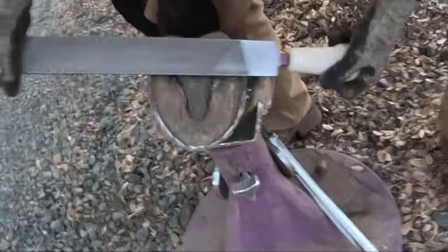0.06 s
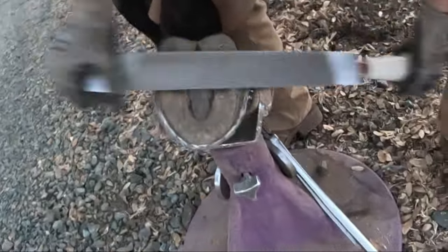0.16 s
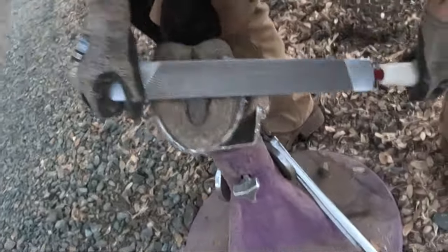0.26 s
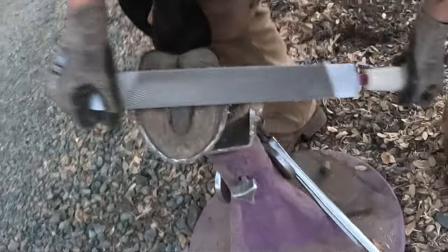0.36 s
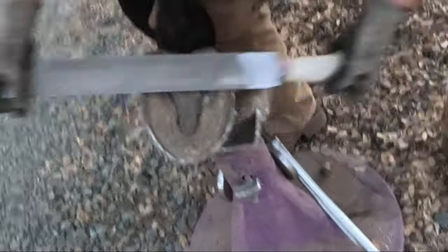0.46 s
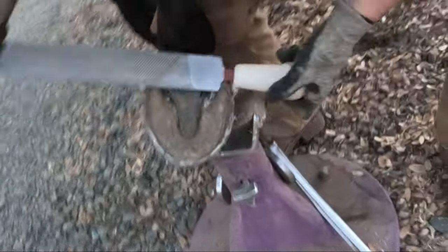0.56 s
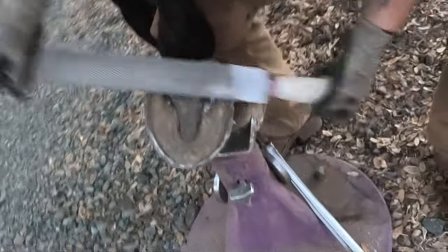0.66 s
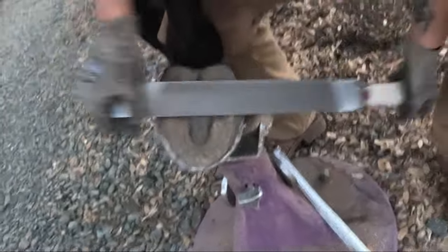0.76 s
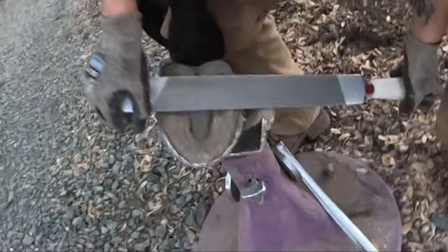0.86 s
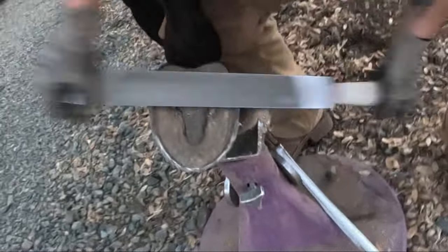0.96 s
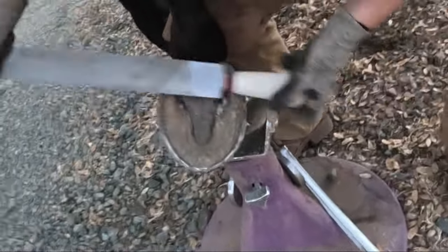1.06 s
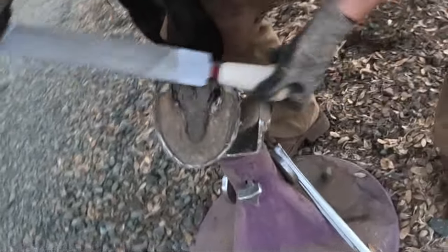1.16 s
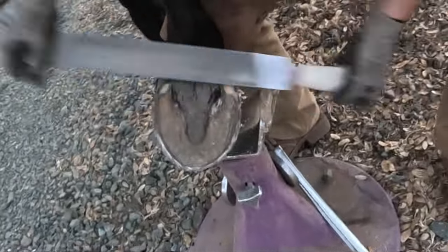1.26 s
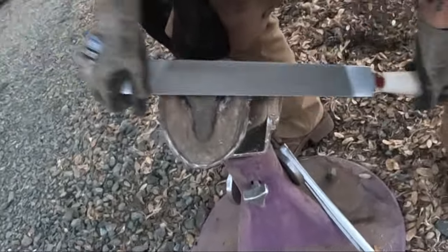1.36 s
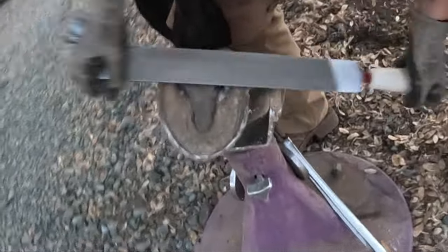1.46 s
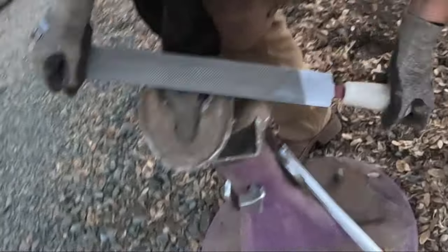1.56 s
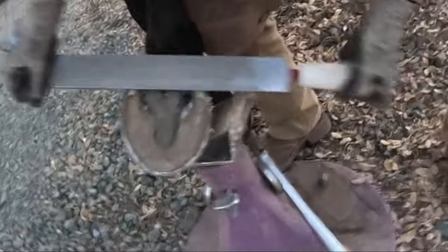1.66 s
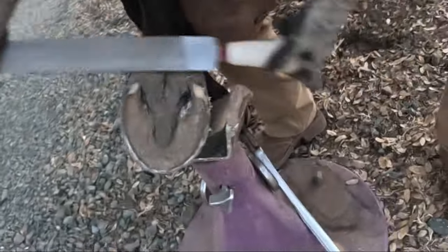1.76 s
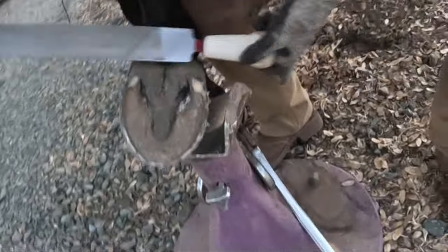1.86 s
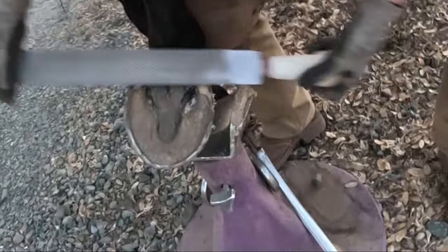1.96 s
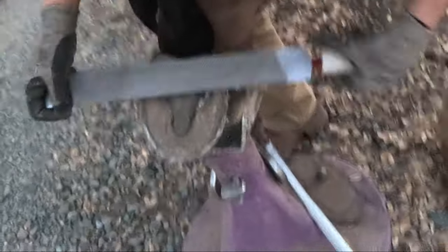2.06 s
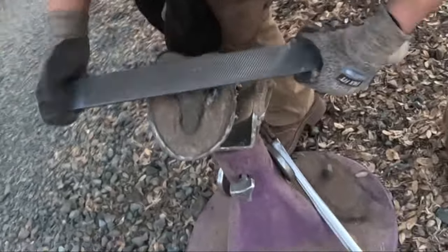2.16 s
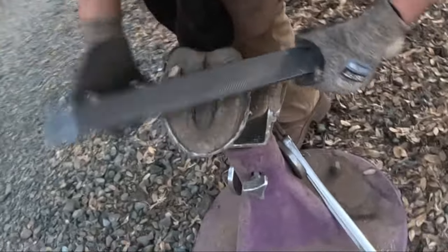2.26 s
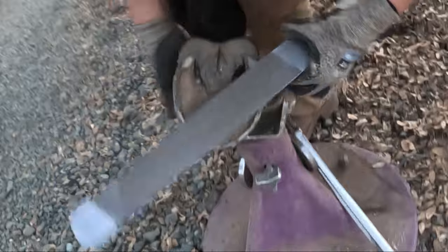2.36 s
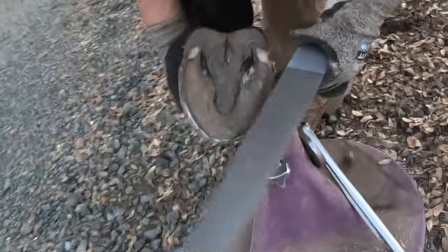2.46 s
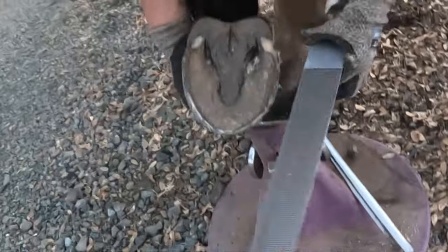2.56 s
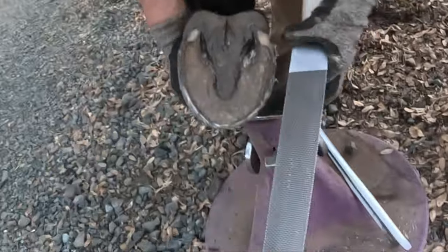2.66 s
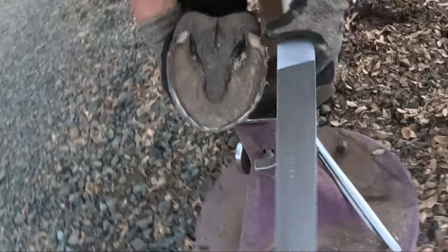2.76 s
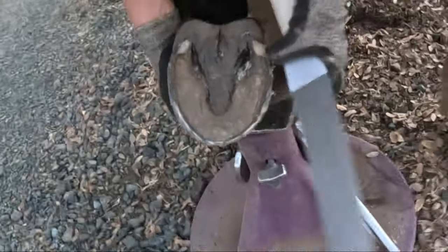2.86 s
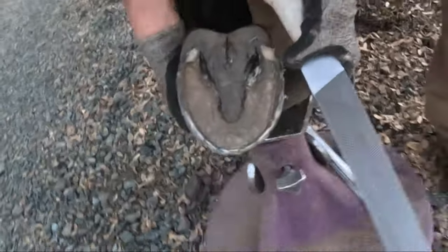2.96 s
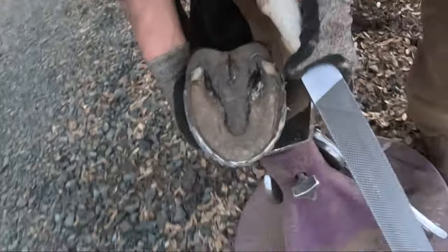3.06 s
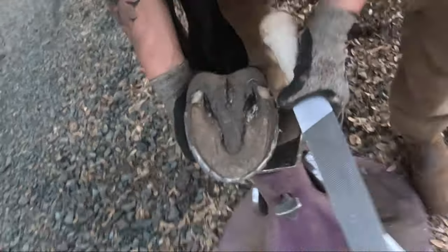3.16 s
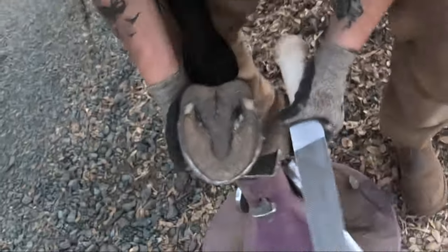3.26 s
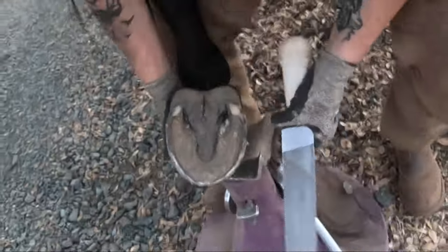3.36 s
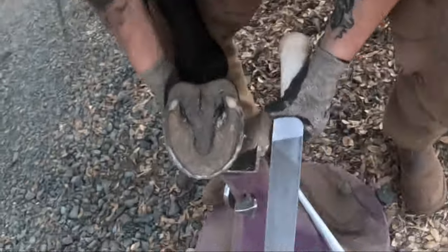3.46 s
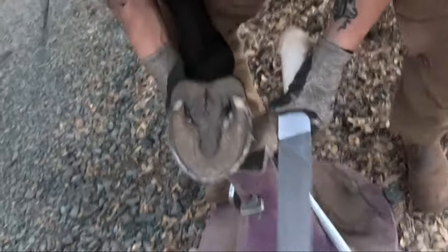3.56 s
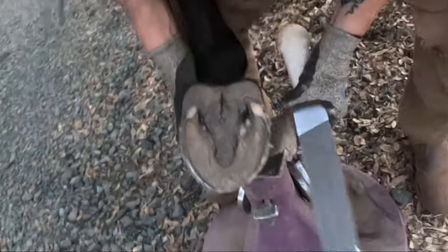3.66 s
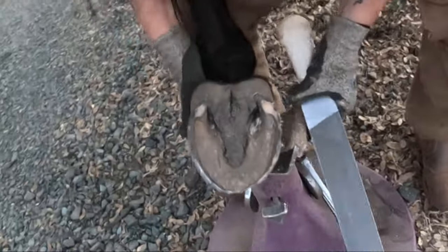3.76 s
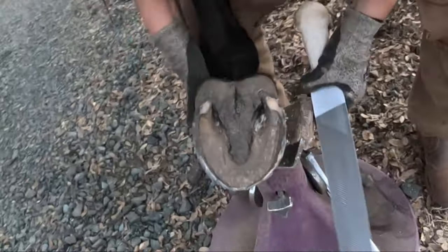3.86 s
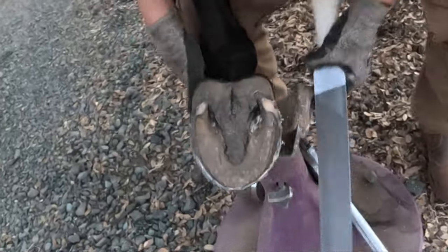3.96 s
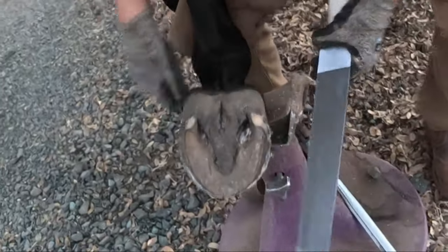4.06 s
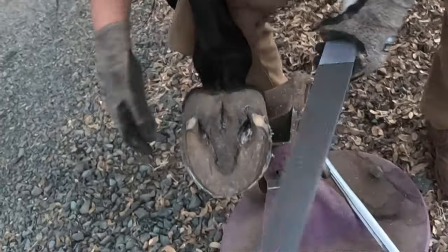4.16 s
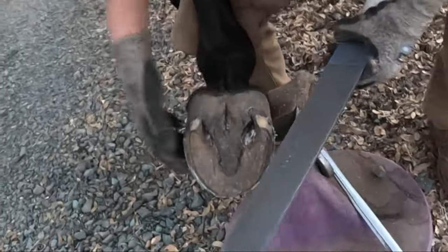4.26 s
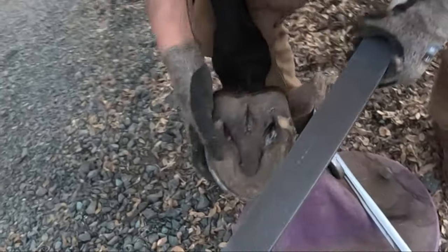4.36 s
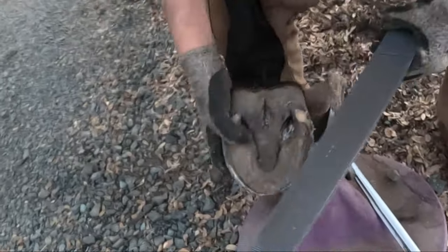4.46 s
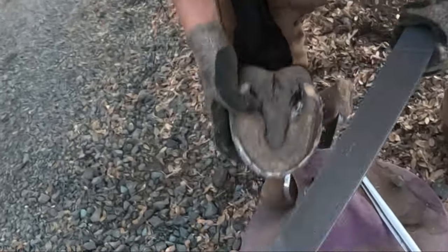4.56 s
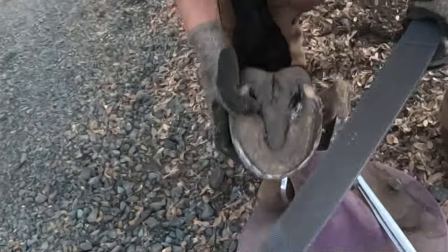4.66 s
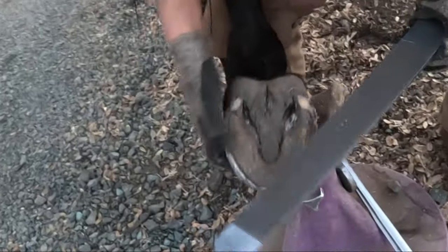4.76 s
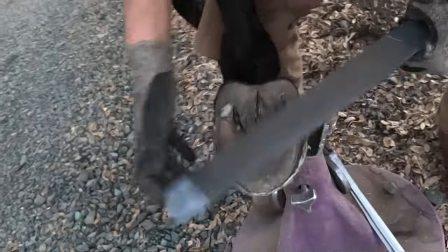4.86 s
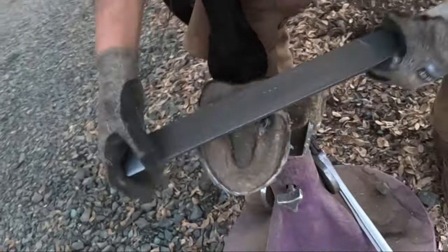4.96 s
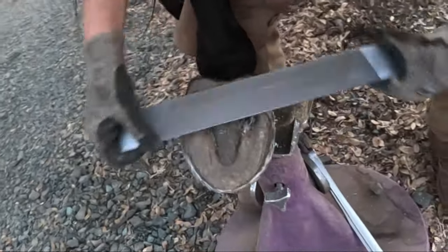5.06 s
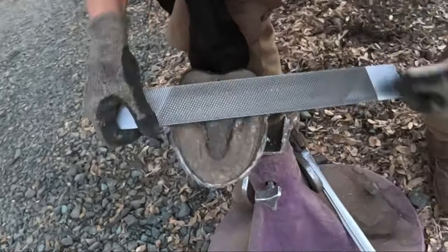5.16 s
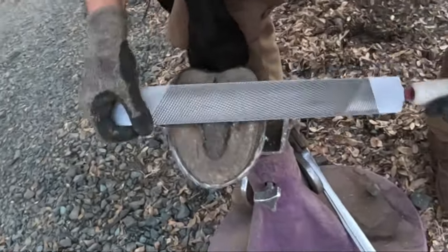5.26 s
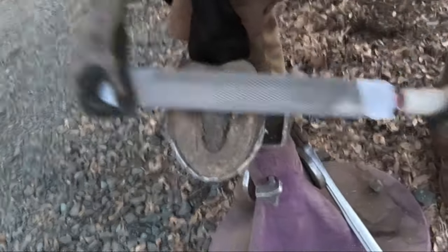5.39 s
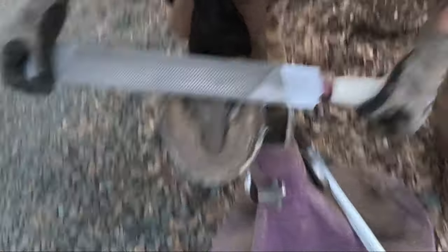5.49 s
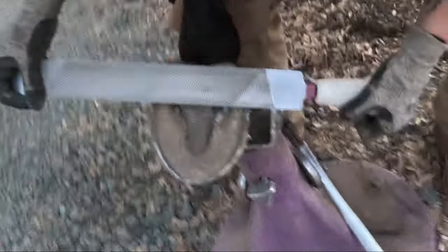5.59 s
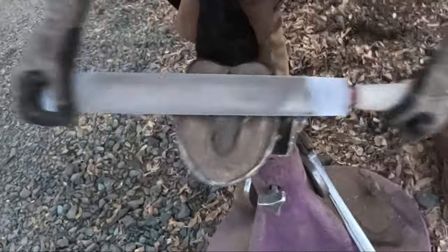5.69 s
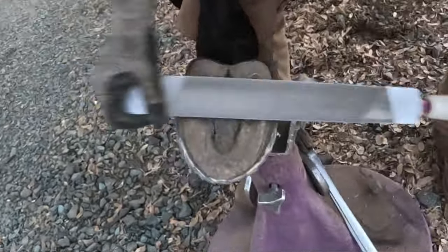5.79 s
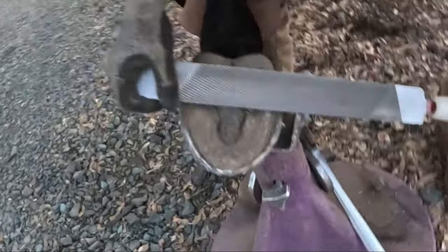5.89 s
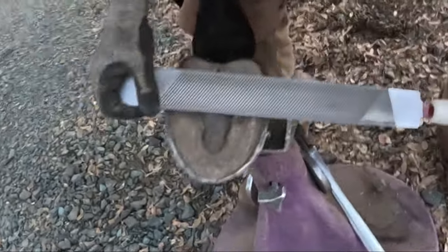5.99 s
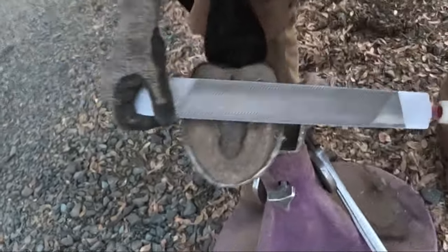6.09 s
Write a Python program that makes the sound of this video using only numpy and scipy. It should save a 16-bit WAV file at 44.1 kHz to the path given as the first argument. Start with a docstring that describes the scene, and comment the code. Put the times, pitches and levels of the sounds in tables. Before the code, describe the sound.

Close, dry, outdoor sound in one channel, over faint steady air hiss and soft deep wind rumble. From 0 to 1.25 s a flat steel rasp cuts a horse's hoof in five short strokes, about four per second, each under a fifth of a second: gritty tearing, growing brighter, with metallic ringing and a hollow low shake from the plastic stand. Light bumps fall between them. Weaker strokes come at 1.6 and 1.75 s, the latter buried under a loud rattling cluster of hollow knocks. A small metallic touch and rustle come near 2.2 s, then quiet glove and cloth shuffling. From 3.0 to 3.9 s the hoof bumps and shifts unevenly, loudest at 3.2 s, with further knocks at 3.35 and 3.65 s. Soft rubbing dwindles from 4.1 s to near stillness around 5. A light steel tap at 5.25 s precedes final strokes at 5.5 and 5.85 s, with small knocks between; the last rings brightest.

```python
"""A flat steel rasp files a horse's hoof that rests on a hollow plastic stand, outdoors.
Random grains, standing for teeth tearing chips from the horn, ring the steel bar and shake hoof and stand.
The hoof shifts and knocks in its cradle: noise and clicks ring the modes (natural pitches) of the stand.
Gloves and cloth rustle as coloured grains; a light wind rumbles on the microphone as deep noise,
and a steady coloured noise makes the distant outdoor hiss."""
import sys
import numpy as np
from scipy import signal
from scipy.fft import rfft, irfft, next_fast_len
from scipy.io import wavfile

SR = 44100
rng = np.random.default_rng(int(sys.argv[2]) if len(sys.argv) > 2 else 0)


def pcm_store(signal):
    """Save signal as 16-bit PCM."""
    levels = np.round(np.clip(np.atleast_2d(signal), -1, 1) * 32767)
    wavfile.write(sys.argv[1], SR, levels.astype(np.int16).T)


N = 270271   # length of the scene in samples

# rasp strokes: (start [s], time to full speed [s], length [s], cutting level [dB], time to hardest push [s],
# shake of the stand [dB], treble of the bite at the start [dB], contact at the start [share of bar length],
# contact at the end [share of bar length], ring of the bar against the chips [dB])
STROKES = [(-0.04, 0.042, 0.16, -23, 0.086, -24.5, -16.5, 0.35, .75, -13),
           (0.19, 0.13, .18, -23.5, 0.14, -21.5, -17, 0.2, .75, -10.5),
           (0.494, 0.047, 0.21, -25.5, 0.15, -22, -13.5, 0.28, 0.743, -16.5),
           (0.763, 0.1, 0.19, -26.5, 0.11, -25, -15.5, 0.21, 0.857, -7.5),
           (1.054, 0.071, 0.2, -27, 0.12, -25, -11.5, 0.28, .75, -10),
           (1.57, 0.036, 0.14, -35, 0.066, -30.5, -11.5, 0.25, 0.8, -6.5),
           (1.71, 0.16, .2, -40, .1, -27, -17, .35, 0.724, -8),
           (5.503, 0.12, 0.16, -28, 0.11, -38.5, -17, 0.27, 0.9, -10),
           (5.84, 0.053, 0.15, -22.5, 0.03, -28.5, -15.5, 0.36, 0.67, -3)]
# hoof knocking in the cradle: (time [s], relative strength [dB], pitch most strongly struck [Hz])
KNOCKS = [(0.145, -17, 567), (0.624, -3.5, 496), (1.166, -6, 250), (1.512, -16.5, 483), (1.731, 7.5, 310),
          (1.742, 4.5, 285), (1.755, 2.5, 243), (1.774, 8, 259), (1.798, -6, 400), (1.942, -20, 1008),
          (1.965, -21.5, 597), (2.204, -15.5, 238), (2.494, -19.5, 220), (2.82, -16.5, 352),
          (3.007, -1.5, 650), (3.021, -2.5, 300), (3.069, -8, 684), (3.088, -12.5, 634), (3.202, -4.5, 754),
          (3.213, 3.5, 633), (3.222, 9, 274), (3.242, -3.5, 296), (3.289, -1, 673), (3.327, -10.5, 681),
          (3.352, 5, 710), (3.377, -3, 668), (3.491, -21.5, 524), (3.519, -28, 255), (3.639, 3.5, 413),
          (3.77, -7.5, 576), (3.855, -13, 242), (3.918, -17.5, 535), (4.128, -12.5, 259),
          (4.565, -25.5, 514), (4.724, -30, 587), (4.76, -33.5, 705), (5.001, -32, 300),
          (5.273, -23.5, 507), (5.341, -26.5, 508), (5.618, -8.5, 1220), (5.74, -5, 560),
          (5.748, -6.5, 357), (5.81, -9.5, 272)]
# rasp touching down on the horn: (time [s], relative strength [dB])
TAPS = [(1, -38), (1.51, -22), (1.516, -20), (2.166, -25.5), (2.173, -20.5), (3.634, -22), (3.639, -18.5),
        (5.235, -22), (6.083, -32.5)]
# grit ticking under a glove: (time [s], relative strength [dB], centre [Hz])
TICKS = [(1.0256, -35, 3750), (1.205, -7.5, 3540), (2.6554, -34, 3130), (2.7252, -29, 3850),
         (1.977, -37, 5540), (3.0949, -32, 4040), (3.5406, -20.5, 3450), (4.7671, -30.5, 6900)]
# bending modes of the steel bar: (pitch [Hz], width while filing [Hz], relative level [dB])
BAR_MODES = [(1170, 60, -2), (1703, 50, -2), (2430, 70, 1), (3245, 90, 0), (4270, 75, -3), (5215, 75, -7),
             (6275, 85, -10), (7545, 75, -12), (8760, 120, -18), (10400, 90, -24), (12700, 60, -31),
             (13100, 60, -33)]
# modes of hoof and stand: (pitch [Hz], width while shaken [Hz], relative level [dB])
STAND_MODES = [(212, 140, -3.5), (249, 42, 4.5), (353, 47, -3.5), (518.8, 73, -5), (638, 60, -8),
               (718, 84, -8), (820, 140, -12.5), (1032, 100, -16.5), (1343, 120, -16), (1970, 170, -26)]
# colour of the torn horn: (frequency [Hz], relative level [dB per Hz])
CHIPS = [(530, -18.5), (900, -1.5), (1670, 1), (2020, -6.5), (2420, 2.5), (3220, 4), (3670, -9),
         (4390, -10), (4770, -13.5), (7680, -24.5), (13100, -40), (15500, -51)]
# colour of the rubbing cloth: (frequency [Hz], relative level [dB per Hz])
CLOTH = [(530, -42), (900, -3), (2120, -3), (3220, -7.5), (4660, -18), (9180, -24.5), (15500, -45)]
# colour of the distant outdoor hiss: (frequency [Hz], relative level [dB per Hz])
AIR = [(82, -34), (140, 8), (497, -2.5), (868, -32), (1580, -2), (1970, -14.5), (9780, -23), (12000, -58.5),
       (15600, -61.5), (22000, -120)]
# wind on the microphone: (time [s], level [dB])
WIND = [(0.05, -42), (0.912, -44.5), (1.108, -41), (1.399, -51.5), (1.658, -45), (2.006, -48), (3.43, -43),
        (4.915, -54), (5.645, -42), (6.096, -48)]
# hoof, gloves and cloth shifting: (time [s], rise [s], hold [s], fall [s], shake of the lower modes [dB],
# shake of the upper modes [dB], rustle [dB], treble of the rustle against the rest [dB])
SHIFTS = [(1.513, 0.017, 0.013, 0.14, -33, -39.5, -49.5, -2.5),
          (1.729, 0.036, .05, 0.061, -9.5, -17, -35.5, -13),
          (2.181, 0.033, 0.011, 0.16, -32, -37.5, -41.5, -14),
          (2.341, 0.12, .01, 0.13, -44, -52, -45.5, -16), (2.487, 0.089, 0.025, 0.26, -34.5, -49, -44, -20),
          (2.74, 0.24, 0.018, 0.16, -60, -57, -44.5, -13),
          (2.822, 0.041, 0.012, 0.073, -36.5, -41, -44, -12),
          (2.971, 0.068, 0.063, 0.1, -20, -21, -40.5, -4.5),
          (3.204, 0.012, 0.012, 0.087, -11.5, -13.5, -28, -19.5),
          (3.297, 0.026, 0.0055, 0.12, -35, -23.5, -45.5, -7),
          (3.351, 0.033, 0.011, 0.058, -24, -28, -39.5, -11.5),
          (3.385, 0.037, 0.018, 0.28, -30.5, -25.5, -42, -10.5),
          (3.522, 0.077, 0.025, 0.072, -22.5, -24.5, -45.5, -14.5),
          (3.63, 0.018, 0.012, 0.12, -25, -26.5, -39.5, -18),
          (3.771, 0.014, 0.0072, 0.091, -36, -32.5, -62, -8),
          (3.844, 0.018, 0.028, 0.081, -29, -35, -54, -7), (3.92, 0.033, 0.007, .1, -33, -32.5, -30, -27),
          (4.14, 0.14, 0.018, 0.056, -38.5, -41.5, -45, -16), (4.39, 0.12, .01, 0.41, -61, -61, -55.5, -13),
          (4.754, 0.057, 0.016, 0.065, -57, -43, -60.5, -8),
          (4.86, .06, 0.024, .2, -73.5, -72.5, -63.5, -6),
          (5.241, .05, 0.023, 0.19, -48.5, -51, -47.5, -8.5),
          (5.667, .05, 0.017, 0.13, -35.5, -42, -56, -18), (5.75, .02, 0.019, .1, -38, -36, -63, -10),
          (5.81, 0.024, 0.029, 0.072, -30, -30, -40.5, -34)]
# steady handling under the shifts: (time [s], rustle [dB], shake [dB])
HANDLING = [(0.15, -60, -40), (0.4, -55, -64), (0.49, -50, -56), (0.76, -51, -46), (1.0, -57.5, -53),
            (1.27, -56.5, -47.5), (1.42, -76.5, -77), (1.92, -55.5, -47.5), (2.1, -70, -72),
            (2.25, -54.5, -51.5), (3.15, -55.5, -46.5), (3.45, -61.5, -52), (4.05, -50, -41.5),
            (4.29, -62, -51), (4.9, -62, -69), (5.2, -59, -59), (5.48, -62.5, -87), (5.7, -49, -36),
            (6.0, -57, -47.5), (6.12, -62, -55)]

AIR_DB = -62.5
UPPER_STAND_HZ, TREBLE_HZ = 420, 4880   # where the stand's upper modes and the treble begin
CUTOFF_HZ = 15700
CUT_POWER, PUSH_POWER = 1.37, 1.18   # cutting level and shake grow as these powers of the effort
BITE_SWING_DB = 13   # the treble of the bite grows by this much along each stroke
STROKE_UPPER_DB = -1   # upper modes against lower while filing and handling
SETTLE_DB_PER_S = 357   # fastest fall of the shake from the strokes
SWING_DB = 30   # a shift rises and falls by this much in its rise and fall times
HANDLING_TREBLE_DB = -11   # treble of the steady rustle against the rest


def amp(db):
    """Turn decibels into a gain."""
    return 10 ** (np.asarray(db) / 20)


def rms_one(x):
    """Scale to an rms (average strength) of 1."""
    return x / np.sqrt(np.mean(x ** 2) + 1e-20)


def in_time(rows, column):
    """One column of a table, joined by straight lines in time."""
    rows = np.array(rows)
    return np.interp(np.arange(N) / SR, rows[:, 0], rows[:, column])


def drift(rate_hz):
    """A slow random wander with an rms of 1, made at every 40th sample and joined by lines."""
    r = np.exp(-80 * np.pi * rate_hz / SR)
    noise = rng.standard_normal(N // 40 + 2002)
    slow = signal.lfilter([1], [1, -2 * r, r * r], noise)[2000:]   # drop the filter's start
    return np.interp(np.arange(N) / 40, np.arange(len(slow)), rms_one(slow))


def grains(per_s, spread_db):
    """Random clicks of uneven size and sign, with an rms of 1."""
    sizes = amp(spread_db * np.minimum(rng.exponential(1, N), 5))
    signs = rng.choice([-1, 1], N)
    present = rng.random(N) < per_s / SR
    return rms_one(sizes * signs * present)


def colour(x, spectrum):
    """Filter by a (Hz, dB per Hz) table, then scale to an rms of 1."""
    size = next_fast_len(N)
    hz, level_db = np.transpose(spectrum)
    log_hz = np.log(np.arange(size // 2 + 1) * SR / size + 1)   # 1 Hz added to avoid log of zero
    gain = amp(np.interp(log_hz, np.log(hz), level_db))
    return rms_one(irfft(rfft(x, size) * gain, size)[:N])


def ring(x, hz, width_hz):
    """A click sets off a dying sine; a wider mode dies faster."""
    r, w = np.exp(-np.pi * width_hz / SR), 2 * np.pi * hz / SR
    return signal.lfilter([0, np.sin(w)], [1, -2 * r * np.cos(w), r * r], x + 1e-18)


def split(x, hz):
    """The low and the high part around a frequency."""
    return [signal.sosfilt(signal.butter(4, hz, kind, fs=SR, output="sos"), x) for kind in ("low", "high")]


def bursts(times, levels_db, rise_s, fall_s):
    """Short noise bursts that swell and die."""
    shape = np.zeros(N) + 1e-18
    shape[(np.asarray(times) * SR).astype(int)] = amp(levels_db)
    shape = signal.lfilter([1], [1, -np.exp(-1 / (fall_s * SR))], shape)
    rise = np.exp(-1 / (rise_s * SR))
    shape = signal.lfilter([1 - rise], [1, -rise], shape)
    return shape * rng.standard_normal(N)


def brighten(x, treble_db):
    """Set the level of the treble against the rest."""
    dull, sharp = split(x, TREBLE_HZ)
    return rms_one(dull) + rms_one(sharp) * amp(treble_db)


def effort(start, to_peak, length):
    """Rise from 0 to 1 and back along a half-sine, with its top at the given delay."""
    top = min(to_peak, length - .005)
    turn = np.interp(np.arange(N) / SR - start, [0, top, length], [0, np.pi / 2, np.pi])
    return np.sin(turn).clip(0) * (turn < np.pi)


def along_strokes(first, last):
    """A value that runs from first to last through every stroke."""
    ends = np.ravel([(s, s + length) for s, _, length, *_ in STROKES])
    values = np.column_stack([first, last]).ravel()
    return np.interp(np.arange(N) / SR, np.maximum.accumulate(ends), values)


def pushing():
    """Gain with which the strokes shake the stand; its fall is limited to a set speed."""
    push = sum(amp(db) * effort(s, to_push, length) ** PUSH_POWER
               for s, _, length, _, to_push, db, *_ in STROKES)
    fall_db = SETTLE_DB_PER_S * np.arange(N) / SR
    push_db = 20 * np.log10(push + 1e-9)
    return amp(np.maximum.accumulate(push_db + fall_db) - fall_db)


def shifting(levels_db):
    """Gain of all shifts: each rises, holds and dies away, and their powers add."""
    t = np.arange(0, N, 32) / SR
    power = 0
    for (s, rise, hold, fall, *_), db in zip(SHIFTS, levels_db):
        before = (s - t).clip(0, 1) / rise
        after = (t - s - hold).clip(0, 1) / fall
        power = power + amp(db - SWING_DB * (before + after)) ** 2
    return np.interp(np.arange(N) / SR, t, np.sqrt(power))


def rasp():
    """Teeth tear chips and drive the bar; a mode is loud where the contact lies on a peak of its bending."""
    teeth = grains(12000, spread_db=-2.0) * amp(1.9 * drift(77))
    *_, bite_db, first, last, ring_db = np.transpose(STROKES)
    place = along_strokes(first, last)
    half_waves = 4.5 * np.sqrt(np.array(BAR_MODES)[:, 0] / BAR_MODES[0][0])   # pitch grows as their square
    steel = np.zeros(N)
    for k, (hz, width, db) in enumerate(BAR_MODES):
        driven = teeth * np.cos(np.pi * half_waves[k] * place)
        steel += amp(db) * np.sqrt(width) * (-1) ** k * ring(driven, hz, width)
    cut = amp(along_strokes(ring_db, ring_db)) * rms_one(steel) + colour(teeth, CHIPS)
    level = sum(amp(db) * effort(s, to_peak, length) ** CUT_POWER
                for s, to_peak, length, db, *_ in STROKES)
    filing = level * brighten(cut, along_strokes(bite_db, bite_db + BITE_SWING_DB))
    return filing + touch_down()


def touch_down():
    """Short noise bursts strike the bar, whose modes die faster than while filing."""
    at, tap_db = np.transpose(TAPS)
    taps = bursts(at, tap_db, rise_s=0.00063, fall_s=0.0042)
    return sum(amp(db - 25) * (-1) ** k * ring(taps, hz, 2.05 * width)
               for k, (hz, width, db) in enumerate(BAR_MODES))


def stand():
    """Strokes, handling and shifts shake the modes of hoof and stand; knocks strike them."""
    slips = grains(2500, spread_db=2.5) * amp(2.12 * drift(40))
    low, high = np.zeros((2, N))
    for k, (hz, width, db) in enumerate(STAND_MODES):
        uneven = slips * amp(2 * drift(4.2))   # each mode wanders by itself
        mode = amp(db) * np.sqrt(width) * (-1) ** k * ring(uneven, hz, width)
        if hz < UPPER_STAND_HZ:
            low += mode
        else:
            high += mode
    *_, lower_db, upper_db, _, _ = np.transpose(SHIFTS)
    steady = np.hypot(pushing(), amp(in_time(HANDLING, 2)))
    lower_level = np.hypot(steady, shifting(lower_db))
    upper_level = np.hypot(steady * amp(STROKE_UPPER_DB), shifting(upper_db))
    body = rms_one(low) * lower_level + rms_one(high) * upper_level
    knocks, crack = knocking()
    return split(split(body + knocks, 109)[1] + crack, 2420)[0]


def knocking():
    """Each knock strikes hardest the modes near its own pitch and cracks briefly."""
    at, knock_db, knock_hz = np.transpose(KNOCKS)
    luck = rng.normal(0, 1, (len(at), len(STAND_MODES), 2))
    knocks = np.zeros(N)
    for k, (hz, width, _) in enumerate(STAND_MODES):
        reach = at + 0.001235 * abs(luck[:, k, 0])   # a soft contact does not start all modes at one instant
        octaves_away = abs(np.log2(hz / knock_hz))
        clicks = np.zeros(N)
        clicks[(reach * SR).astype(int)] = amp(knock_db - 14.5 - 7.1 * octaves_away + 4.2 * luck[:, k, 1])
        knocks += (-1) ** k * ring(clicks, hz, 0.54 * width)   # rings longer than when shaken
    crack = split(bursts(at, knock_db - 17.0, rise_s=0.0015, fall_s=0.0033), 490)[1]
    return knocks, crack


def rustle():
    """Gloves and cloth rub: dense grains, sparse grit of scattered pitch and a few lone ticks."""
    *_, shift_db, treble_db = np.transpose(SHIFTS)
    steady = amp(in_time(HANDLING, 1))
    level = np.hypot(steady, shifting(shift_db))
    treble = np.hypot(steady * amp(HANDLING_TREBLE_DB), shifting(shift_db + treble_db))
    cloth = colour(grains(8700, spread_db=1.0) * amp(2.3 * drift(30)), CLOTH)
    grit = sum(ring(grains(7.5, spread_db=7.5), hz, 0.14 * hz) for hz in np.geomspace(900, 7000, num=9))
    rubbed = cloth + amp(-5.5) * colour(grit, CLOTH)
    rubbed = brighten(rubbed, 20 * np.log10(treble / level))
    ticks = sum(ring(bursts([s], [db - 19.5], rise_s=0.00035, fall_s=0.0029), hz, 800)
                for s, db, hz in TICKS)
    return rubbed * level + ticks


def wind():
    """Lumpy pressure on the microphone: noise kept to the deep bass, with a wandering level."""
    deep = split(split(rng.standard_normal(N), 37.6)[0], 130)[0]
    lumps = split(deep, 2.6)[1]
    gusts = amp(2.5 * drift(3))
    return rms_one(lumps * gusts) * amp(in_time(WIND, 1))


def distant_hiss():
    """Steady outdoor hiss: random noise given the colour of the air."""
    return amp(AIR_DB) * colour(rng.standard_normal(N), AIR)


def scene():
    """Add up all sources in one channel."""
    return (rasp() + stand() + rustle() + wind() + distant_hiss())[None]


def record(dry):
    """Clip the peaks and cut the highest treble steeply."""
    steep = signal.cheby2(20, 80, CUTOFF_HZ + 250, fs=SR, output="sos")
    return signal.sosfilt(steep, np.clip(dry, -.98, .98)).clip(-1, 1)


dry = scene()
out = record(dry)
pcm_store(out)
```